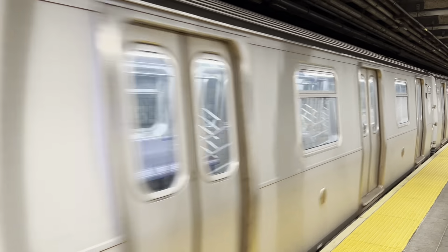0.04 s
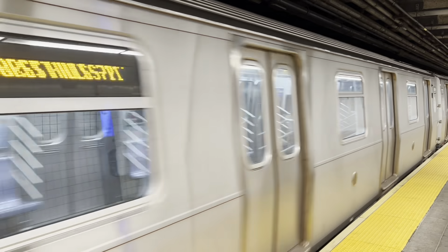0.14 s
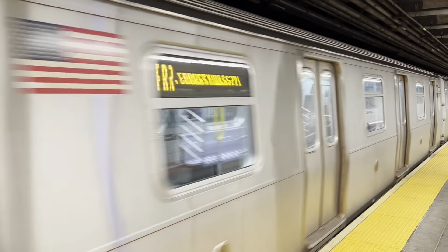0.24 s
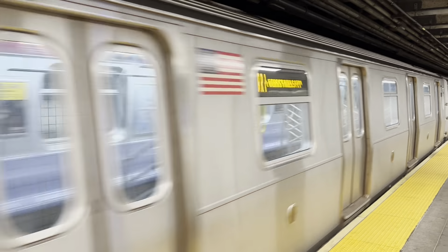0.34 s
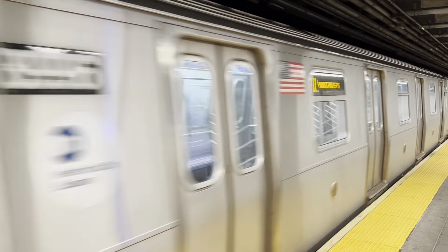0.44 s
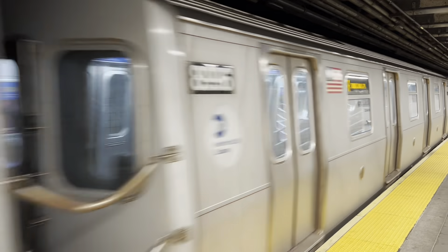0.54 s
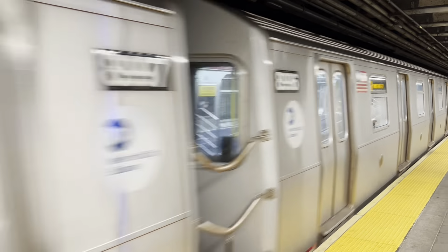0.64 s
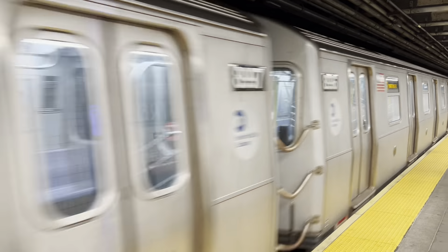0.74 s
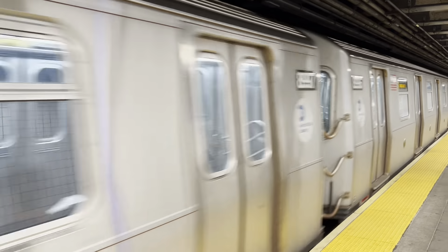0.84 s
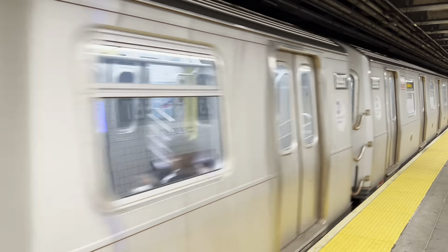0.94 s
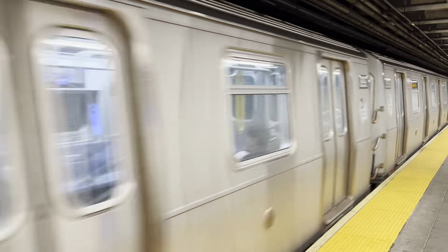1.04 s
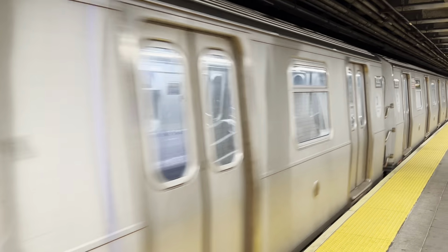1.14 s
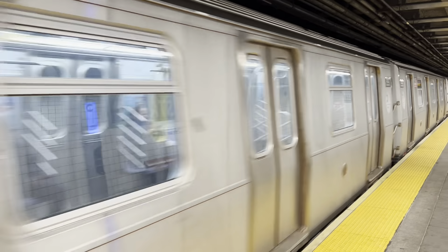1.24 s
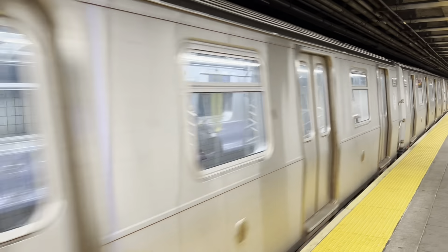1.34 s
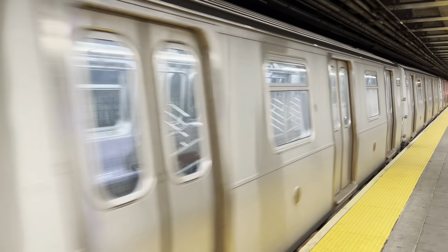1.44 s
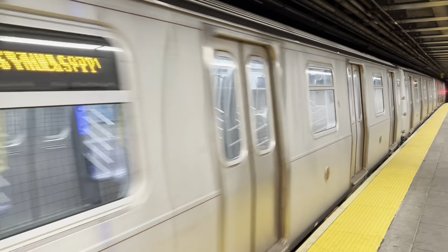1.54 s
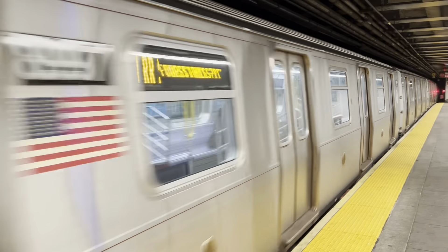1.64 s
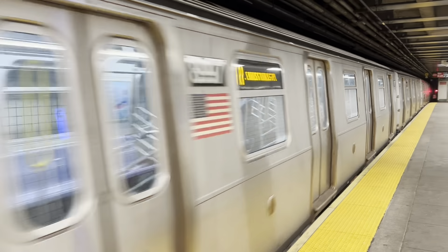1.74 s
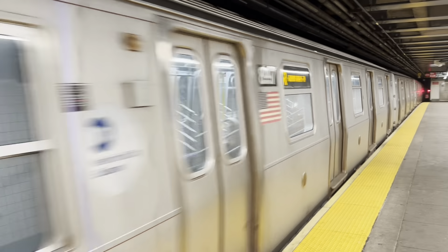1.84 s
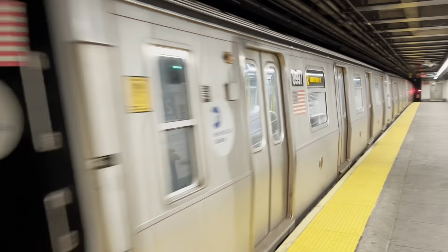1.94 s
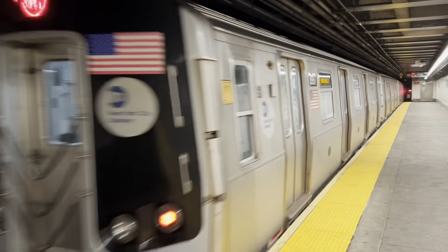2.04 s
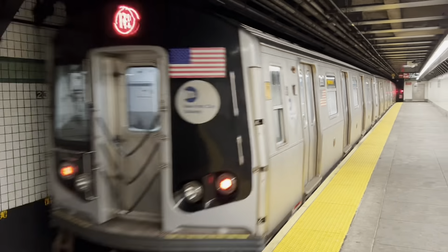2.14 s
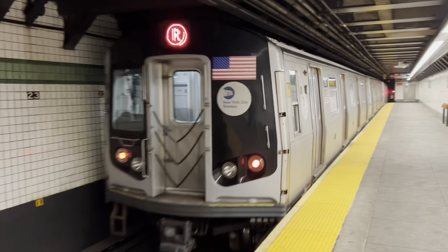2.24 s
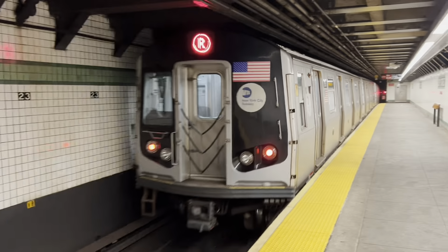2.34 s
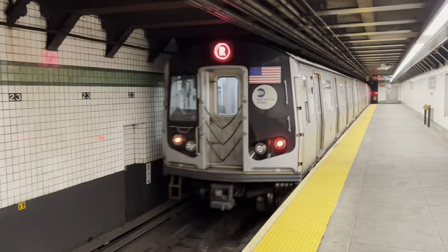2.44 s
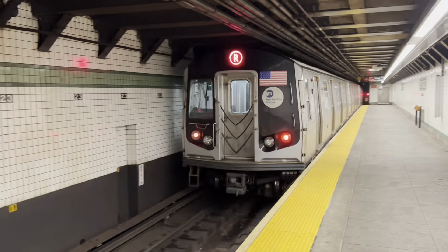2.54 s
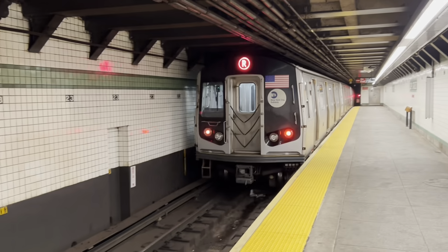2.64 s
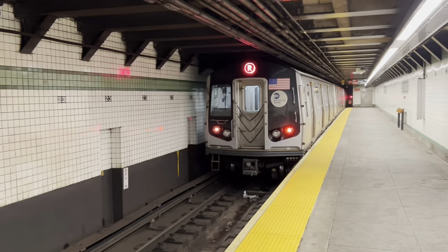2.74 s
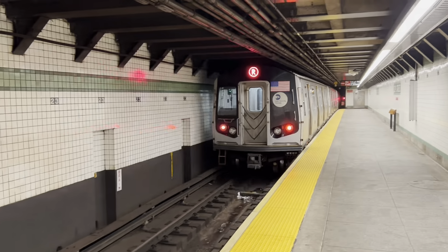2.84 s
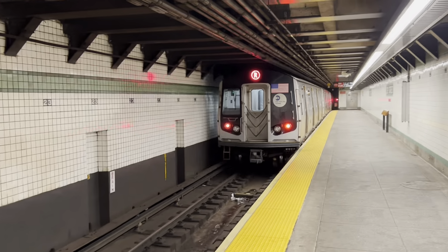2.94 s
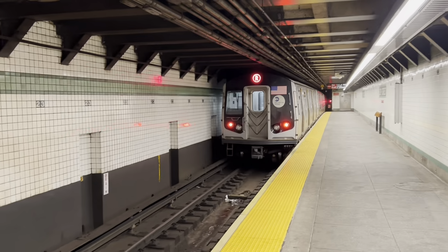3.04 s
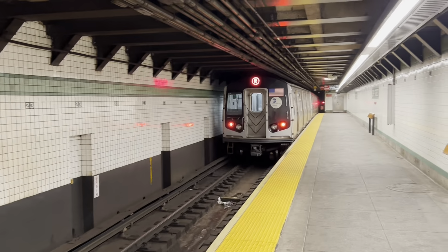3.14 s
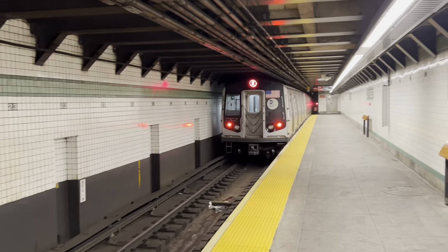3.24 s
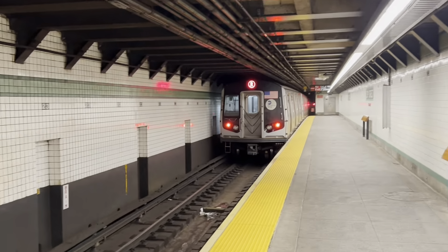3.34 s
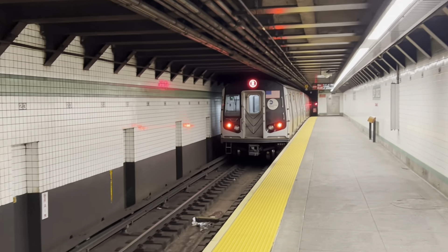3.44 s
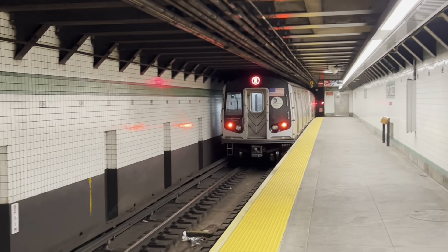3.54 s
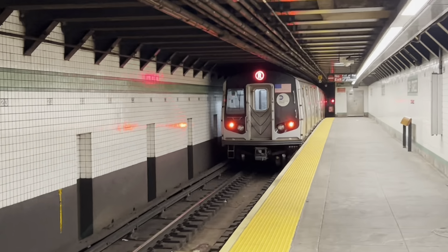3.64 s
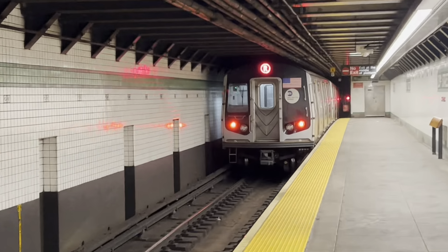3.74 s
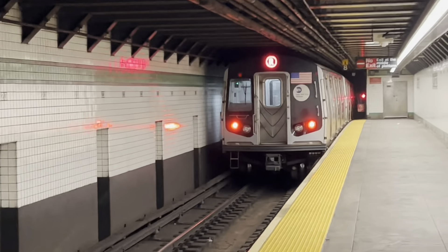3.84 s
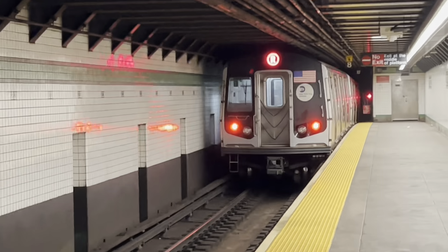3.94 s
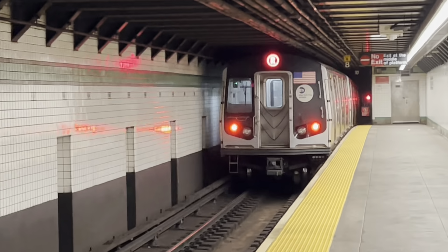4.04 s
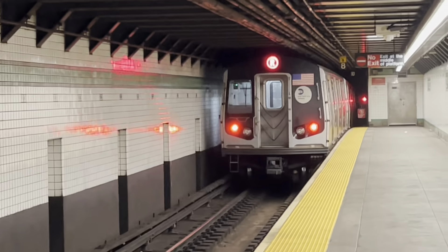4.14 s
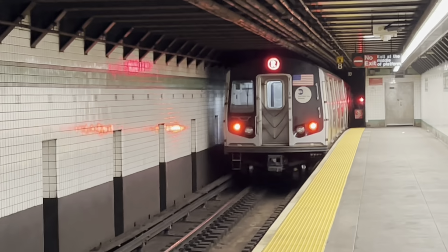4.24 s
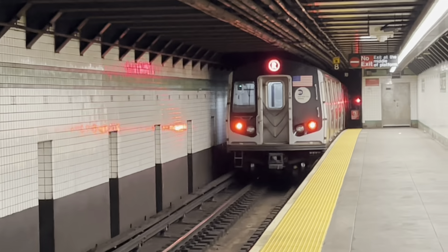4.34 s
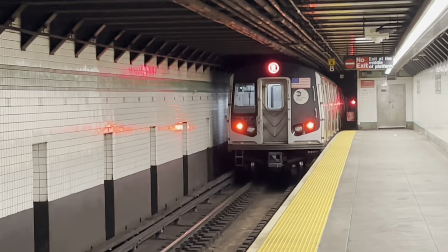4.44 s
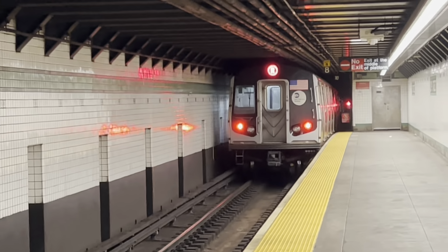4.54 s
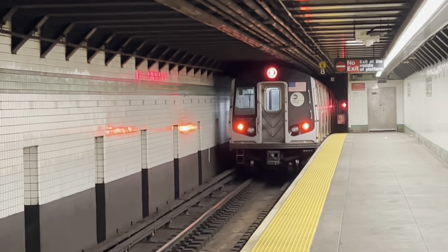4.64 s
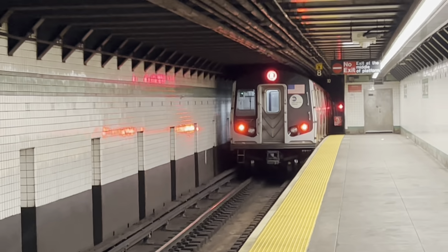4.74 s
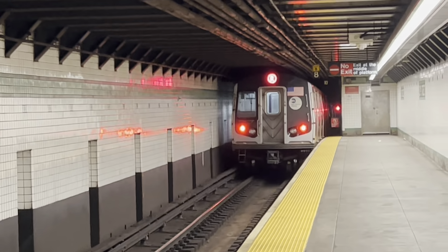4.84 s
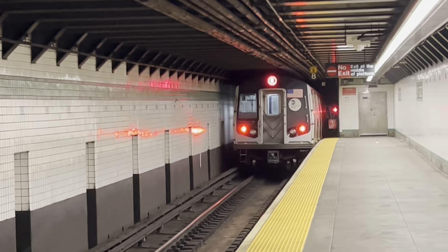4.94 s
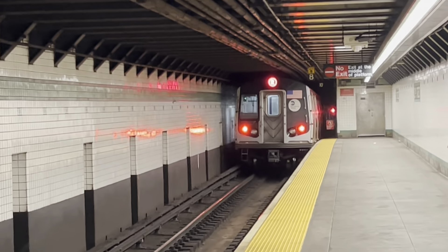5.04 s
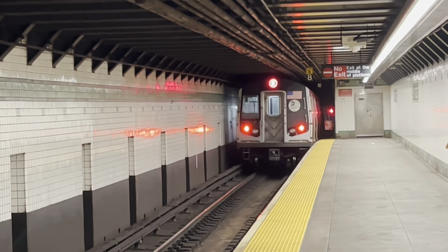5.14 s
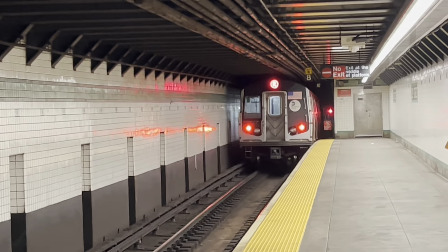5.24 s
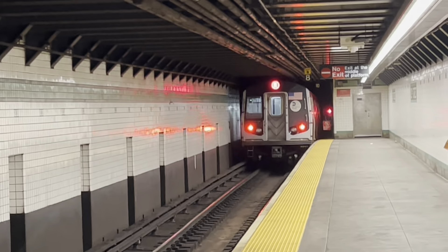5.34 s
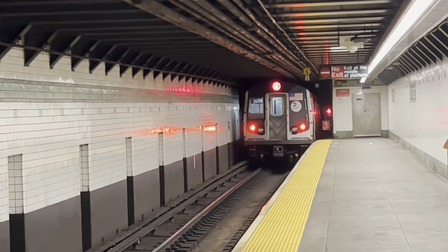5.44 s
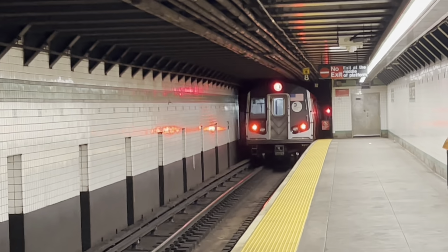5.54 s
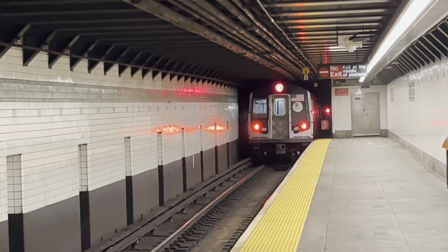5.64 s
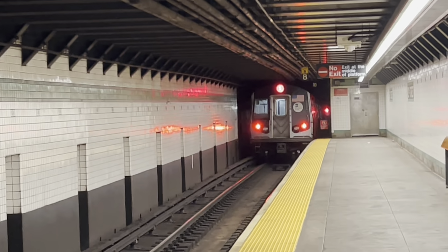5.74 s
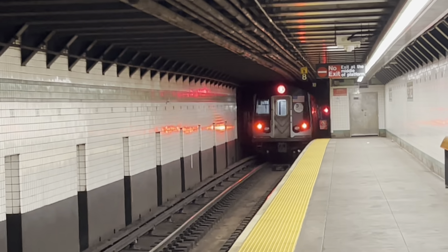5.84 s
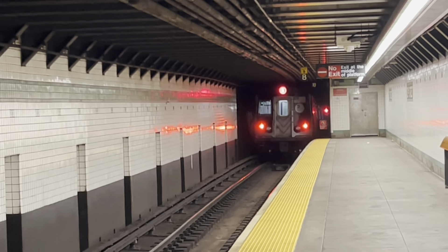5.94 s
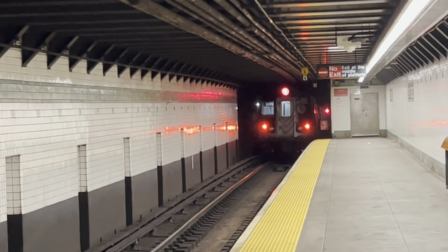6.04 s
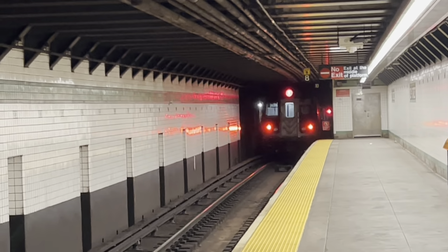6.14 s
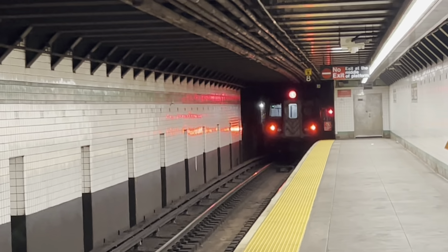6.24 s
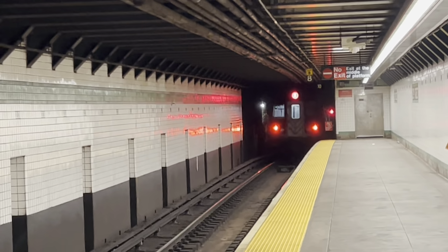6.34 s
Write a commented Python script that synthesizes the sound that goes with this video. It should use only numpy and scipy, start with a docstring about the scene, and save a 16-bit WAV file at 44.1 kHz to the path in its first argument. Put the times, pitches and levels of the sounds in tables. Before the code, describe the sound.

Close rumbling subway cars gather speed beside the platform, wheel pairs cracking on rail joints with bright steel rattle and echo. Draught knocks and flutters on the handheld-style stereo microphone. After two seconds the train's end passes, treble hiss thins, and the sound moves away: hollow tunnel roar, a resonant bloom, thin electric whistle, flange scrape, distant clacks and a late puff of wind.

```python
"""Tiled subway platform, microphone about 3.4 m from the track, as a train pulls past into the tunnel.
First its cars rumble close by, rail joints clack in tightening pairs, gears whine and wind knocks at the ports.
Around two seconds in, the tail clears the microphone: hiss thins out and the tunnel roar takes over.
Then rumble blooms, flanges squeal and scrape, motors whistle, the roar swells near four seconds, and distant
clacks and gusts go on. Shaped noise makes rumble and wind; narrow noise and decaying modes make the tones."""
import sys
import numpy as np
from scipy import signal
from scipy.fft import rfft, irfft, next_fast_len
from scipy.io import wavfile
from scipy.ndimage import uniform_filter1d, map_coordinates

SR = 44100
rng = np.random.default_rng(int(sys.argv[2]) if len(sys.argv) > 2 else 0)


def digitize_waveform(pressure):
    """Quantize a signal to 16-bit integers and store it at the path in sys.argv[1].

    Rows of a 2-D input are taken as channels; values are limited to [-1, 1].
    """
    field = np.atleast_2d(pressure).T
    bounded = np.clip(field, -1, 1)
    quanta = np.round(bounded * 32767).astype(np.int16)
    wavfile.write(sys.argv[1], SR, quanta)


N = 282680

# Loudness of the rolling wheels, reference for rumble and roar: time_s, level_db (relative)
ROLLING_LEVEL = [(0.0, -21.5), (0.46, -19.5), (0.71, -21.5), (1.02, -23), (1.8, -19.5), (1.91, -19),
                 (2.12, -26), (2.28, -30), (2.45, -27.5), (2.84, -25.5), (3.19, -26.5), (4.12, -29),
                 (4.36, -30), (4.71, -30.5), (5.25, -30), (5.87, -33), (6.41, -27.5)]
# Spectra of car bodies, tunnel boom, rail hiss and steel edge (also in the joint blows):
# freq_hz, level_db (relative, per Hz)
CAR_SPECTRUM = [(30, -12), (70, -16.5), (160, -5), (260, -5), (400, -1), (540, -4.5), (700, -6.5),
                (1000, -14.5), (1400, -20.5), (2500, -51), (6000, -66)]
TUNNEL_SPECTRUM = [(100, -28), (300, 0), (470, -1), (590, 5.5), (670, 0), (780, 1), (900, 1.5),
                   (1080, -2.5), (1420, -1), (1650, -4), (1950, -8), (2200, -17), (2600, -14.5),
                   (4000, -32.5), (9000, -55.5)]
HISS_SPECTRUM = [(900, -11.5), (2000, 5), (2600, 2.5), (3300, -2.5), (3900, -2.5), (4500, -8), (5100, -8),
                 (5800, -15), (6400, -13), (8000, -23), (10000, -37), (12000, -32), (15500, -40)]
EDGE_SPECTRUM = [(1500, -37), (3500, -2), (5000, 0.5), (6200, 1), (7600, 2), (9000, 0), (10200, -4.5),
                 (12000, -2), (14000, -2), (15500, -7)]
TAIL_S, TAIL_FADE_S = 2.15, 0.056  # the end of the train clears the microphone
CARS_DB, CARS_BEHIND_DB = 1, -3.5  # body rumble over the rolling level; its change behind the train
ROAR_DB, ROAR_BEHIND_DB = -5.5, 2.5  # tunnel roar over the rolling level; its change behind the train
ROAR_GRIT_DB, ROAR_GRIT_PER_S = 1.18, 45  # rough patches of rail make the roar surge: depth and rate
MOUTH_S, MOUTH_LENGTH_S, MOUTH_DB = 4.03, 0.28, 7  # the last cars reach the tunnel mouth
HISS_DB, HISS_DB_PER_DOUBLING = -36, -2  # rail hiss beside a truck; its fall with distance
HISS_FOLLOWS = 0.36  # share of the rolling swells, in dB, that the hiss follows
SIZZLE_DB, SIZZLE_DB_PER_DOUBLING = -51, -8.5  # top treble of the wheels, strongest close by


def rolling():
    """Rough wheels shake the cars, boom in the tunnel and hiss on the rail; behind the train the tunnel leads."""
    level_db, = curves(ROLLING_LEVEL)
    behind, far, unevenness = onset(TAIL_S, TAIL_FADE_S), doublings(), wobble(14)

    cars_db = level_db + CARS_DB + CARS_BEHIND_DB * behind + 1.33 * unevenness
    cars = amp(cars_db) * rush(CAR_SPECTRUM, patchy_db=2.0)

    mouth_db = MOUTH_DB * bell(MOUTH_S, MOUTH_LENGTH_S)
    roar_db = level_db + ROAR_DB + ROAR_BEHIND_DB * behind + mouth_db
    grit_db = ROAR_GRIT_DB * wobble(ROAR_GRIT_PER_S)
    tunnel = amp(roar_db + grit_db) * rush(TUNNEL_SPECTRUM, patchy_db=2.5)

    swells_db = HISS_FOLLOWS * (level_db - level_db.mean())
    hiss_db = HISS_DB + HISS_DB_PER_DOUBLING * far + swells_db
    hiss = amp(hiss_db + 0.61 * wobble(25)) * rush(HISS_SPECTRUM, patchy_db=2.5)

    sizzle_db = SIZZLE_DB + SIZZLE_DB_PER_DOUBLING * far + 1.6 * wobble(26)
    sizzle = amp(sizzle_db) * noise(EDGE_SPECTRUM)
    return cars + tunnel + hiss + sizzle


# The last two trucks pass the microphone at these times, on a track this far away
TRUCKS_PASS_S, TRACK_M = [.35, 1.85], 3.4


def doublings():
    """How often the distance to the nearest truck has doubled from its value beside the microphone."""
    t = np.arange(N) / SR
    # speed halfway between two times gives the exact path under steady acceleration
    paths_m = [np.abs(t - s) * speed((t + s) / 2) for s in TRUCKS_PASS_S]
    along_track_m = np.min(paths_m, axis=0)
    return np.log2(np.hypot(1, along_track_m / TRACK_M))


SPEED_M_S, ACCEL_M_S2 = 12.42, .46  # the train's speed at time 0 and its acceleration


def speed(t):
    """The train gathers speed steadily (m/s)."""
    return SPEED_M_S + ACCEL_M_S2 * t


# Body of a truck's clang: freq_hz, level_db (relative, per Hz)
CLANG_SPECTRUM = [(100, -11), (350, 8), (800, 8.5), (1300, 3), (1900, 3.5), (2300, -3), (2700, -1.5),
                  (3300, -7.5), (4000, -10), (5500, -15), (9000, -40)]
# Reverberation of the tiled station: freq_hz, decay_t60_s
STATION_DECAY = [(200, 0.9), (1000, 1.18), (3000, 1.11), (7000, 0.7), (15000, 0.49)]
BLOW_RING_DB, MODE_SCATTER_DB = -4.5, 3.5  # offset of the wheel modes in a blow; spread from blow to blow
CRACK_T60_S, PING_DB = 0.027, -3  # decay of the direct crack; steel ping relative to the crack
CLANK_DB = 0.5  # loose gear, over the clang


def joints():
    """Each wheel cracks on the joint, the truck rattles and the tiled station rings."""
    out, t = np.zeros((2, N)), np.arange(SR) / SR
    for start_s, edge_db, clang_db, distance_m, crack_db, ping_hz in axle_blows():
        air = lambda hz: amp(-.25 * distance_m * (hz / 10000) ** 2)  # air absorbs the treble
        excited_db = BLOW_RING_DB + MODE_SCATTER_DB * rng.standard_normal(len(WHEEL_MODES))
        edge = noise(EDGE_SPECTRUM, size=SR)
        steel = unit(filtered(edge, lambda hz: wheel(hz, excited_db) * air(hz)))
        clang = amp(clang_db + 4.5) * noise(CLANG_SPECTRUM, size=SR)

        hz, age_s, bands = signal.stft(amp(edge_db - 15.5) * steel + clang, SR, nperseg=256)
        decay = amp(-60 * age_s / along(STATION_DECAY, hz)[:, None])
        tail = signal.istft(bands * decay, SR, nperseg=256)[1][:, :SR]
        build_up = 1 - np.exp(-t / (0.0019 + 0.00067 * distance_m))  # far blows arrive smeared
        rattle = amp(2.2 * wobble(66, size=SR) * np.exp(-t / 0.045))
        spread = amp([[0], [4 / np.sqrt(distance_m / 2.9)]])  # close blows echo from all sides
        echo = unit(spread) * tail * build_up * rattle

        direct = amp(edge_db + crack_db) / distance_m  # direct sound falls with distance
        crack = direct * amp(-60 * t / CRACK_T60_S) * steel
        add(out, start_s, direct * amp(PING_DB) * ping(ping_hz))
        add(out, start_s, echo + crack + amp(clang_db + CLANK_DB) * clanks())
    return out


# Trucks crossing rail joints: rear_axle_s, steel_edge_db, clang_db, distance_m, front_axle_db (over rear),
# rear_crack_db, front_crack_db (over the edge), ping_hz; edge and clang levels are relative
JOINT_CROSSINGS = [(0.3554, -16, -27, 5.5, -1.5, -1.5, 4.5, 6160),
                   (0.7435, -16.5, -24.5, 4.4, 0, 2.5, 0, 7830), (1.329, -25.5, -29.5, 18, -1, 4, -2, 6300),
                   (1.8006, -16.5, -26, 4, -1, 3, -1.5, 6440), (2.72, -22, -26.5, 9.3, -2, 0.5, -1, 7300),
                   (3.623, -27, -25, 13, -4.5, -4, -5, 3750), (3.974, -28.5, -29.5, 11, -7, -2, -4, 4050),
                   (4.594, -34.5, -32, 27, -8.5, 0, 0, 2620), (5.024, -37, -34, 23, -7, 5, 0, 2670),
                   (6.022, -35.5, -31.5, 32, -1, 4, 5, 3850)]
WHEELBASE_M = 2.08  # between the two axles of a truck


def axle_blows():
    """Each truck strikes twice, a wheelbase apart, so the pairs tighten as the train speeds up."""
    for (rear_s, edge_db, clang_db, distance_m, front_db,
         rear_crack_db, front_crack_db, ping_hz) in JOINT_CROSSINGS:
        front_s = rear_s - WHEELBASE_M / speed(rear_s)
        yield front_s, edge_db + front_db, clang_db + front_db, distance_m, front_crack_db, ping_hz
        yield rear_s, edge_db, clang_db, distance_m, rear_crack_db, ping_hz


# Modes of a struck wheel: pitch_hz, width_hz, level_db (over the broad base, before each blow's offset)
WHEEL_MODES = [(4020, 380, 3), (5000, 150, -14), (6330, 280, -1), (7250, 300, -3.5), (7830, 190, -9.5),
               (8440, 180, -7), (12300, 160, -2), (13700, 300, -1), (14930, 190, 9)]


def wheel(hz, excited_db):
    """Resonances of the wheel, each excited to its own level, standing on a broad base."""
    response = 1
    for (pitch_hz, width_hz, level_db), extra_db in zip(WHEEL_MODES, excited_db):
        response = response + amp(level_db + extra_db) / (1 + (2 * (hz - pitch_hz) / width_hz) ** 2)
    return response


PING_T60_S, PING_SPREAD = 0.048, .05  # ring time; relative spread of the split modes


def ping(hz):
    """The struck wheel rings in a cluster of split modes around one pitch."""
    t = np.arange(SR // 5) / SR
    split_hz = hz * np.exp(PING_SPREAD * rng.standard_normal(size=(5, 1)))
    modes = np.sin(2 * np.pi * (split_hz * t + rng.random(size=(2, 5, 1))))
    return unit(modes.sum(axis=1)) * amp(-60 * t / PING_T60_S)


CLANK_DELAY_S, CLANK_HZ, CLANK_T60_S = .05, 3790, 0.059  # mean delay, middle pitch, ring time
CLANK_DULL_HZ = 4780  # soft rebounds excite modes above this only faintly


def clanks():
    """Loose gear under the truck rebounds, the later the weaker; each rebound has its own modes."""
    out, t = np.zeros((2, SR)), np.arange(SR // 20) / SR
    for delay_s in rng.exponential(CLANK_DELAY_S, size=9):
        hz = CLANK_HZ * np.exp(0.25 * rng.standard_normal(size=(6, 1)))
        modes = np.sin(2 * np.pi * (hz * t + rng.random(size=(2, 6, 1))))
        modes = modes / (1 + (hz / CLANK_DULL_HZ) ** 6)
        add(out, delay_s, amp(-40 * delay_s - 60 * t / CLANK_T60_S) * modes.mean(axis=1))
    return out


# Short resonant swells, low rumble blooms of the rolling train and high flange squeals:
# middle_s, length_s (the swell spans 1.4 times this), pitch_hz, width_hz, level_db (relative)
RESONANT_SWELLS = [(1.87, .18, 1155, 60, -28.5), (2.08, .3, 6400, 220, -55), (2.2, .2, 1605, 70, -40),
                   (2.765, .17, 890, 180, -24), (2.755, .13, 790, 80, -26), (2.75, .15, 610, 70, -25),
                   (3.0, .2, 900, 90, -34), (3.06, .11, 450, 80, -27), (3.23, .14, 460, 50, -29.5),
                   (3.17, .45, 6290, 220, -57), (3.47, .1, 6400, 240, -48.5), (3.56, .12, 6400, 220, -50),
                   (4.1, .35, 1410, 100, -35.5), (4.2, .4, 885, 80, -36), (4.22, .3, 6330, 200, -62),
                   (4.66, .2, 2610, 130, -41), (4.7, .25, 380, 60, -36), (5.12, .3, 2630, 150, -49),
                   (5.68, .2, 3900, 220, -53), (5.82, .15, 3820, 220, -53)]
SWELLS_DB, SWELL_FLICKER_DB = -0.5, -1.5  # level of all swells together; depth of their uneven flicker


def resonant_swells():
    """Narrow bands of noise swell and fade: low ones as blooms of the rumble, high ones as flange squeals."""
    out = np.zeros((2, N))
    for middle_s, length_s, pitch_hz, width_hz, level_db in RESONANT_SWELLS:
        size = int(1.4 * length_s * SR)
        swell = np.hanning(size) * amp(SWELL_FLICKER_DB * wobble(32.6, size=size))
        resonance = lambda hz: 1 / (1 + (2 * (hz - pitch_hz) / width_hz) ** 2)
        band = unit(filtered(rng.standard_normal((2, SR)), resonance))[:, :size]
        add(out, middle_s - size / SR / 2, amp(level_db + SWELLS_DB) * swell * band)
    return out


# Wheels ringing as they grind through the tunnel mouth: time_s, lower_mode_db, upper_mode_db
GRIND_LEVELS = [(0, -54, -53), (3.35, -59, -54), (3.53, -37.5, -41), (3.75, -38, -43), (4.03, -44, -34),
                (4.4, -50, -45.5), (4.65, -52, -44), (4.9, -48, -46.5), (5.12, -40.5, -44), (5.4, -55, -49),
                (5.62, -62, -58), (5.93, -45, -40.5), (6.12, -48, -48), (6.41, -53, -53)]
GRIND_HZ, GRIND_WIDTH_HZ = [1778, 1930], 113  # the close pair of wheel modes and the blur of each


def grind():
    """Scraping flanges keep two close wheel modes going; the ring shifts between them."""
    out = np.zeros((2, N))
    for hz, level_db in zip(GRIND_HZ, curves(GRIND_LEVELS)):
        level = amp(level_db + 1.6 * wobble(12))
        out += level * tone(hz * (1 + .009 * wobble(5.4)), width_hz=GRIND_WIDTH_HZ)
    return out


# Gear whines in step with the speed: start_s, end_s, pitch_hz_per_m_s, level_db
GEAR_WHINES = [(.25, 0.916, 32.07, -28.5), (1.42, 2.023, 32.2, -35), (2.853, 4.355, 44.9, -32.5),
               (4.363, 6.6, 44.35, -43)]
WHINE_FADE_S = 0.03


def whines():
    """The gears rise in pitch with speed; each is heard for a stretch of the run."""
    out, m_per_s = np.zeros((2, N)), speed(np.arange(N) / SR)
    for start_s, end_s, hz_per_speed, level_db in GEAR_WHINES:
        heard = onset(start_s, WHINE_FADE_S) * (1 - onset(end_s, WHINE_FADE_S))
        level = heard * amp(level_db + 1.9 * wobble(12))
        pitch_hz = hz_per_speed * m_per_s * (1 + 0.008 * wobble(6))
        out += level * tone(pitch_hz, width_hz=78)
    return out


# Whistle of the traction motors: time_s, level_db
MOTOR_LEVEL = [(1.7, -66), (2.35, -57.5), (2.8, -64), (3.3, -60), (3.8, -67), (4.3, -62), (4.9, -67),
               (5.65, -62), (5.9, -69), (6.41, -70)]
MOTOR_HZ_PER_SPEED = 370.5  # Hz per m/s


def motor():
    """The traction motors whistle thinly, climbing with speed."""
    level_db, = curves(MOTOR_LEVEL)
    pitch_hz = MOTOR_HZ_PER_SPEED * speed(np.arange(N) / SR)
    return amp(level_db + 1.7 * wobble(12)) * tone(pitch_hz, width_hz=96)


# Hard eddies that knock on the microphone: start_s, level_db (relative), pitch_hz (near the peak)
HARD_EDDIES = [(.218, -17, 330), (0.395, -10, 342), (.437, -8.5, 433), (.463, -11, 484), (.5, -15, 55.7),
               (0.65, -10.5, 119), (.69, -9, 415), (0.835, -2.5, 287), (.897, -10.5, 260),
               (.942, -10.5, 190), (.958, -9.5, 97.5), (.975, -10.5, 80), (1.122, -9, 430),
               (1.245, -7.5, 195), (1.39, -5, 236), (1.428, -4.5, 263), (1.444, -1.5, 100), (1.5, -6, 89),
               (1.563, -8.5, 195), (2.023, -12.5, 123), (2.033, -13, 358), (2.047, -4.5, 398.5),
               (2.055, -2.5, 330), (2.2, -22, 54.7), (2.207, -15, 270), (2.372, -18, 90),
               (2.422, -16.5, 80), (3.107, -13.5, 327), (3.217, -21, 470), (3.316, -15, 376),
               (3.364, -10, 420), (3.434, -16.5, 420), (3.529, -14, 565), (3.656, -14.5, 350),
               (3.676, -11, 477), (3.921, -14.5, 263), (3.983, -19, 265), (4.077, -23, 555),
               (4.311, -15, 640), (4.321, -13, 385), (4.424, -15.5, 279), (4.434, -10, 118),
               (5.176, -21, 220), (5.338, -15, 75), (5.421, -12, 79.6), (5.585, -17.5, 296),
               (5.616, -16.5, 209), (6.111, -6.5, 201), (6.114, -11, 640), (6.126, -14, 695),
               (6.129, -8, 190), (6.26, -11.5, 281), (6.354, -13, 317)]
# Spectra of the low flutter and of an eddy's tearing noise: freq_hz, level_db (relative, per Hz)
FLUTTER_SPECTRUM = [(15, -19), (30, -11.5), (55, 2), (90, 2), (150, -2), (300, -10), (700, -13.5),
                    (2000, -104)]
PUFF_SPECTRUM = [(50, -11), (200, -7), (600, 16.5), (950, 9), (1350, -5), (1800, -28), (4000, -63)]
FLUTTER_DB, SWIRLS_DB = -0.63, -4.5  # low flutter and small eddies, relative to the draught
EDDY_RISE_S = 0.0092  # time a hard eddy takes to peak; a slow one takes a whole swing
PUFF_DB, PUFF_HZ = -9, 330  # tearing noise over the swing; eddies below this pitch tear less
KNOCK_SAG, SWIRL_SAG = .2, 0.33  # slowing of hard and small eddies (log pitch per rise time)


def draught():
    """Air dragged along by the train: a low flutter, many small eddies and a few hard ones."""
    db = wind_db()
    swirls, hard = np.zeros(N), np.zeros((2, N))
    mid_only = np.array([[1], [0]])
    for when, (colour, strength) in zip(rng.random(size=260), rng.standard_normal(size=(260, 2))):
        hz = 190 * np.exp(0.578 * colour)
        swirl = eddy(hz, life=0.0048 + 0.99 / hz, rough=0.343, sag=SWIRL_SAG)
        add(swirls, when * N / SR, amp(1.5 * min(strength, 1.3)) * swirl)
    for start_s, level_db, hz in HARD_EDDIES:
        swing = eddy(hz, life=max(EDDY_RISE_S, 1 / hz), rough=0.273, sag=KNOCK_SAG)
        # fast air tears at the rim of each port
        tearing = amp(PUFF_DB) * min(hz / PUFF_HZ, 1) * np.abs(swing)
        puff = tearing * noise(PUFF_SPECTRUM, size=len(swing))
        add(hard, start_s, amp(level_db - 5.0) * (swing * mid_only + puff))
    flutter = amp(db + FLUTTER_DB + 0.8 * wobble(22)) * noise(FLUTTER_SPECTRUM)
    return flutter + amp(db + SWIRLS_DB) * unit(swirls) * mid_only + hard


def eddy(hz, life, rough, sag):
    """A swirl crosses the microphone: a few ragged pressure swings that slow down."""
    t = np.arange(SR // 6) / SR
    slowing = sag * np.clip(1 - t / life, -2, 1)
    pitch_hz = hz * np.exp(slowing + rough * wobble(407, size=len(t)))
    swell = (t / life) ** 2 * np.exp(1 - (t / life) ** 2)
    return swell * np.sin(2 * np.pi * (np.cumsum(pitch_hz) / SR + rng.random()))


# Gusts on the microphone: middle_s, length_s, level_db (relative)
WIND_GUSTS = [(0.258, 0.12, -24), (0.666, .05, -32), (0.864, 0.35, -25.5), (0.97, 0.076, -19.5),
              (1.228, 0.28, -22.5), (1.503, 0.26, -20), (2.058, 0.086, -20.5), (2.424, 0.12, -25.5),
              (2.674, 0.2, -27.5), (3.114, 0.086, -28), (3.4, 0.27, -29.5), (3.644, 0.2, -27),
              (3.978, 0.13, -25), (4.295, 0.092, -28), (4.465, 0.087, -32.5), (4.774, 0.075, -31),
              (5.172, 0.068, -30), (5.373, 0.12, -26), (5.63, 0.33, -29), (6.122, 0.056, -22.5),
              (6.38, 0.36, -27.5)]
DRAUGHT_DB = -36.5  # steady draught between the gusts, on the same scale


def wind_db():
    """Strength of the draught: bell-shaped gusts over a steady flow, added as powers."""
    power = amp(DRAUGHT_DB) ** 2
    for middle_s, length_s, level_db in WIND_GUSTS:
        power = power + (amp(level_db) * bell(middle_s, length_s)) ** 2
    return 10 * np.log10(power)


def bell(s, length):
    """A swell that peaks at time s and stays above one half for length seconds."""
    u = np.abs(np.arange(N) / SR - s) / length
    swell, near = np.zeros(N), u < 2
    swell[near] = .5 ** ((2 * u[near]) ** 2)
    return swell


def onset(s, fade_s):
    """A smooth step from 0 to 1 around time s."""
    return .5 + .5 * np.tanh((np.arange(N) / SR - s) / fade_s)


def tone(hz, width_hz):
    """A line (mid, side) blurred by its many paths through the station."""
    phase = 2 * np.pi * np.cumsum(hz * np.ones(N)) / SR
    a, b = filtered(rng.standard_normal((2, 2, N)), lambda f: 1 / (1 + (2 * f / width_hz) ** 2))
    return unit(a * np.cos(phase) + b * np.sin(phase))


def rush(spectrum, patchy_db):
    """Coloured noise whose resonances swell and fade in patches."""
    bands = signal.stft(noise(spectrum), nperseg=1024)[2]
    field = rng.standard_normal(bands.shape[1:])
    field = uniform_filter1d(field, size=3, axis=0)  # smooth over frequency
    field = uniform_filter1d(field, size=14, axis=1)  # smooth over time
    return unit(signal.istft(bands * amp(patchy_db * unit(field)), nperseg=1024)[1][:, :N])


def noise(spectrum, size=N):
    """Two unrelated coloured noises (mid, side) of rms 1."""
    return unit(filtered(rng.standard_normal((2, size)), lambda hz: amp(along(spectrum, hz))))


def filtered(x, response):
    """x shaped by a complex response of frequency."""
    m = next_fast_len(x.shape[-1] + 8192, True)  # padding keeps the end off the start
    return irfft(rfft(x, m) * response(np.fft.rfftfreq(m, 1 / SR)), m)[..., :x.shape[-1]]


def wobble(rate, size=N):
    """A smooth random curve, rate knots a second."""
    coarse = np.arange(0, size + 32, 32)  # spline every 32 samples, straight lines between
    knots = rng.standard_normal(int(size * rate / SR) + 4)
    smooth = map_coordinates(knots, [coarse * rate / SR], mode="nearest")
    return np.interp(np.arange(size), coarse, smooth)


def curves(rows):
    """One value per sample for each column after the time."""
    s, *cols = np.transpose(rows)
    return [np.interp(np.arange(N) / SR, s, c) for c in cols]


def along(points, hz):
    """(Hz, value) points joined on a log frequency axis."""
    f, v = np.transpose(points)
    return np.interp(np.log(hz + 1), np.log(f + 1), v)


def add(track, s, sound):
    """Mix a sound into a track from time s on."""
    part = track[..., max(round(s * SR), 0):][..., :sound.shape[-1]]
    part += sound[..., :part.shape[-1]]


def amp(db):
    """Decibels to gain."""
    return 10 ** (np.asarray(db) / 20)


def unit(x):
    """Scaled to rms 1."""
    return x / np.sqrt(np.mean(x ** 2) + 1e-20)


# Likeness of the two microphone ports: freq_hz, left_right_likeness (1 = same)
PORT_LIKENESS = [(60, 1), (130, 0.8), (230, 0.84), (500, 0.59), (800, 0.55), (1250, 0.23), (1600, 0.32),
                 (1750, 0.78), (2600, 0.89), (5500, 0.8), (7000, 0.89), (10000, 1), (13000, 0.88),
                 (15000, 0.7)]
# Phase by which the left port leads: freq_hz, lead_rad
PORT_LEAD = [(300, 0), (1080, .8), (1400, 3.1), (1600, 3.6), (1750, 6.3), (3000, 6.9), (4800, 6.4),
             (5750, 5.3), (6600, 6.3), (7700, 5.9), (10000, 3.1), (11900, .7), (13000, 0), (13800, -.6),
             (14900, -3.1)]
# Level of the left port over the right: freq_hz, level_db
PORT_TILT = [(60, 1.5), (99, -1.5), (160, 1.5), (270, 0), (450, 1), (740, 2), (1220, -2), (2010, -1.5),
             (3330, 2), (5500, 0), (9080, -0.5), (15000, 0.0)]


def scene():
    """Mid and side reach two close ports: alike in the bass, shifted in phase higher up."""
    turn = lambda hz: np.arccos(np.clip(along(PORT_LIKENESS, hz), -1, 1)) / 2
    field = rolling() + joints() + resonant_swells() + grind() + whines() + motor() + draught()
    field = field * signal.windows.tukey(N, .001)  # soft ends
    mid, side = filtered(field, lambda hz: np.array([np.cos(turn(hz)), np.sin(turn(hz))]))
    pair = np.array([mid + side, mid - side])
    half = np.array([[.5], [-.5]])  # left and right share each difference
    tilt = lambda hz: amp(half * along(PORT_TILT, hz))
    lead = lambda hz: np.exp(1j * half * along(PORT_LEAD, hz))
    return filtered(pair, lambda hz: tilt(hz) * lead(hz))


BASS_HZ, TOP_HZ = 35, 15600  # band limits of the microphone channel


def record(dry):
    """The microphone channel fades below its bass limit and cuts all above its top limit."""
    return filtered(dry, lambda hz: (hz < TOP_HZ) * hz ** 2 / np.hypot(hz ** 2, BASS_HZ ** 2))


dry = scene()
out = record(dry)
digitize_waveform(out)
```